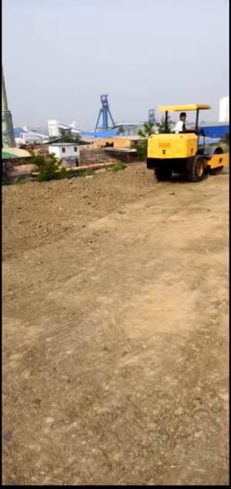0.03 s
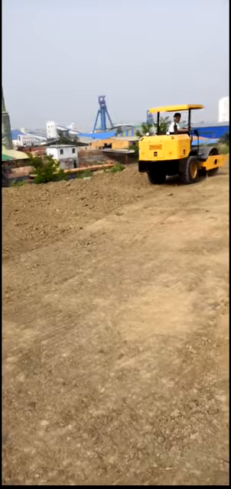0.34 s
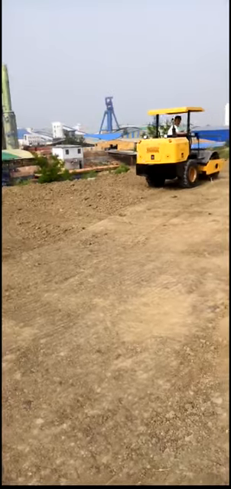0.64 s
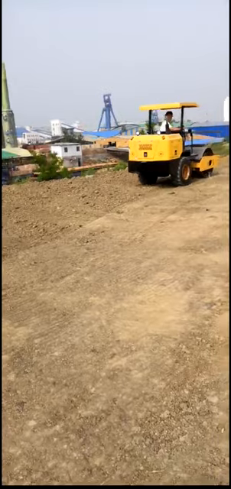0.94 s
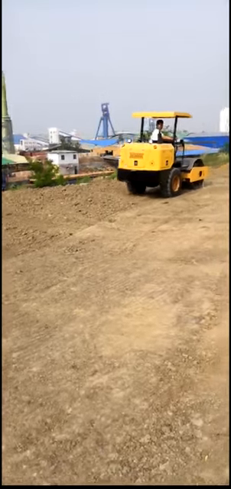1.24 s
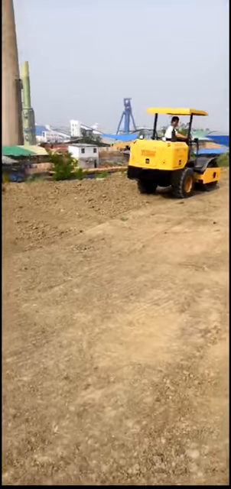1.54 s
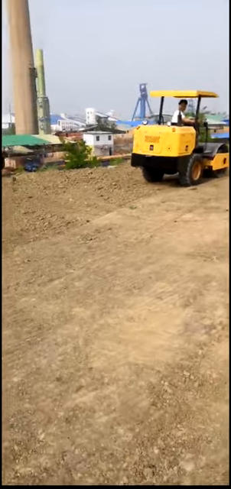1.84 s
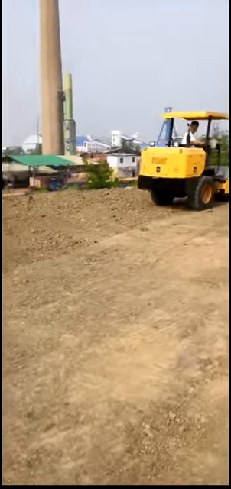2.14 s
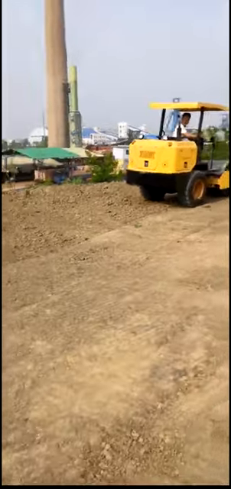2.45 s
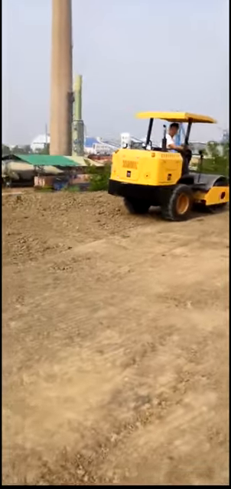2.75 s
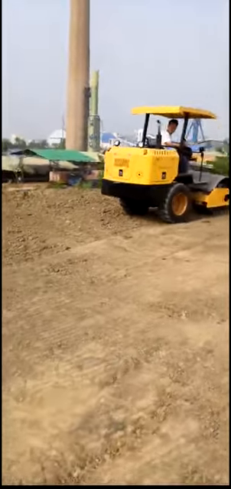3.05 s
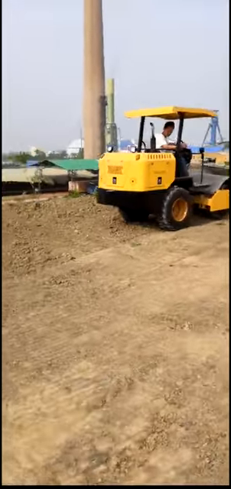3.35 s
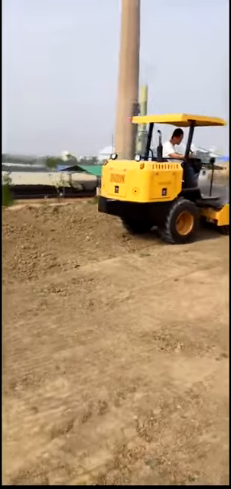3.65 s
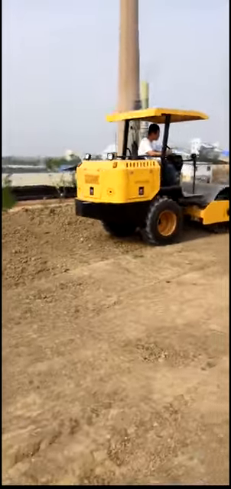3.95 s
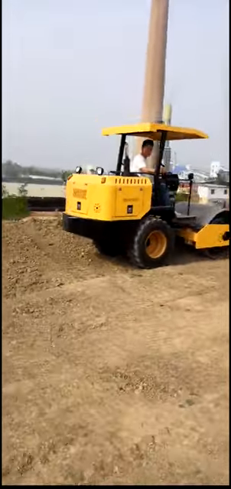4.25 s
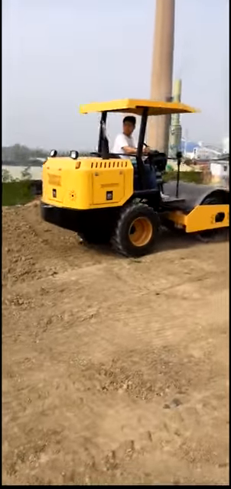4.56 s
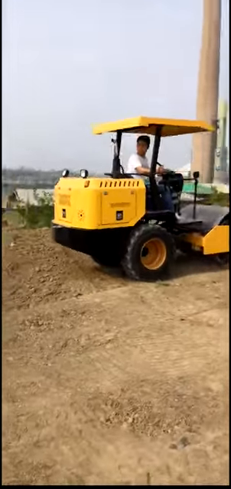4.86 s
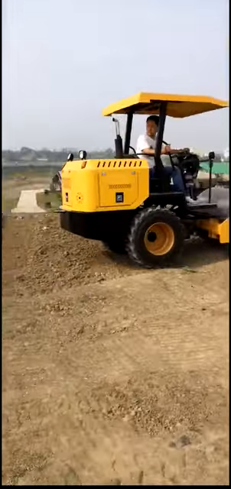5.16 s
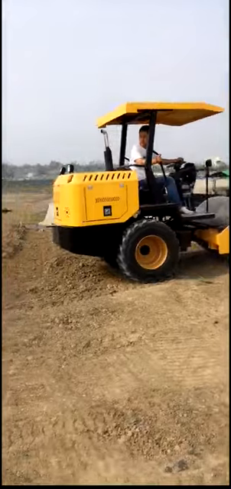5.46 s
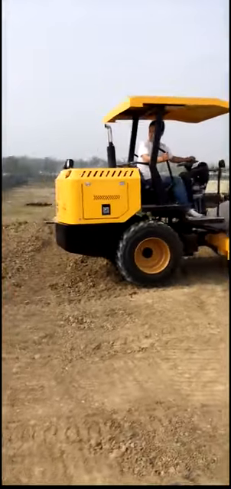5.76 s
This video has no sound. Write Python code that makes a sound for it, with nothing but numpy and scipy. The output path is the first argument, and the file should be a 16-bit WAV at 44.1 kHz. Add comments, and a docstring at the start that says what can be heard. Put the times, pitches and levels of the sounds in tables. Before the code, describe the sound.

A small road roller's diesel engine runs at a steady speed on open dirt ground. A deep exhaust drone comes first, with rapid puffing and metallic knocking over a faint whine. Loose panels rattle lightly in spells, and there is one tiny crack, like a stone under a wheel. As the machine nears the microphone, its rumble and hiss grow.

```python
"""A deep exhaust drone is heard first: a small road roller with a three-cylinder diesel comes closer
over open dirt at a steady, governed speed. Periodic firings make the drone, puff through the silencer
and shake the hood, while combustion knock rings the block. Fan and pumps whine, the drum hums, loose
panels rattle in spells and there is one small crack, as of a stone under a wheel. A hiss grows as
the machine nears and turns its side to the listener."""
import sys
import numpy as np
from scipy import signal
from scipy.fft import rfft, irfft, next_fast_len
from scipy.io import wavfile
from scipy.ndimage import map_coordinates

SR = 44100
rng = np.random.default_rng(int(sys.argv[2]) if len(sys.argv) > 2 else 0)


def store_pcm(level_fs):
    """Save levels as 16-bit WAV."""
    pcm = np.round(np.clip(level_fs, -1, 1) * 32767).astype(np.int16)
    wavfile.write(sys.argv[1], SR, np.atleast_2d(pcm).T)


N = 261072
TIME = np.arange(N) / SR
START_S, CUTOFF_HZ = .335, 13900

# The governor hunts a little. Each row: time in seconds, four-stroke cycles per second.
CYCLE_RATE = [(0.5, 18.629), (0.6, 18.911), (1.4, 18.92), (2.0, 18.775), (2.3, 18.905), (2.8, 18.879),
              (3.0, 18.718), (3.5, 18.984), (3.8, 18.714), (4.2, 18.925), (4.6, 18.73), (5.0, 18.934),
              (5.1, 18.69), (5.6, 18.893)]
# Each row: time in seconds, nearness (0 far, 1 near), turn (0 from behind, 1 side-on).
PATH = [(.3, 0.05, 0), (1.2, 0, 0.26), (2.0, 0.29, 0.21), (2.7, 0.22, 0), (3.4, 0.63, 0.24),
        (4.1, 0.83, 0.093), (4.5, 0.94, 0.48), (5.1, 0.89, 1.03), (5.9, 0.93, 1.14)]
# The engine takes load briefly. Each row: centre in seconds, half length in seconds, strength.
LOAD_SURGES = [(.52, 0.11, 1.05), (.75, 0.15, 1), (2.23, 0.11, 0.7), (2.64, 0.23, 0.8), (2.99, 0.16, 0.63),
               (5.03, 0.053, 0.3), (5.87, .14, 0.3)]
# Each part: level in dB far off, then dB gained when near, when side-on and under load.
DRONE_DB, OVERTONE_DB = (-23.5, 0.65, -2.5, 0), (-25, -4, -9.5, -0.5)
PUFF_DB, HOOD_DB = (-34.5, -7.5, 9.5, 9), (-40, 12, -2, 1.5)
CLATTER_DB, HISS_DB = (-31, 1.82, 2.34, 1.86), (-43.5, 5.5, 2, 1.5)
# The two main exhaust tones swell or fade.
# Each row: centre in seconds, half length in seconds, drone change in dB, overtone change in dB.
EXHAUST_SWELLS = [(.95, .2, 2, 3), (2.79, 0.07, 0.5, -10), (3.024, 0.094, -1, 4), (3.205, 0.09, -0.5, -4),
                  (3.48, 0.084, 0, 6.5), (3.965, 0.037, 0, -8), (4.93, 0.11, .7, -10), (5.175, .07, -1, -4)]
# Weaker engine tones. Each row: multiple of the cycle rate, relative level in dB far off and near.
HARMONICS = [(3, -43, -42), (5, -47, -50), (7, -39.5, -38), (8, -39, -44), (10, -46, -45), (11, -40, -50),
             (12, -35, -38), (13, -48, -46), (14, -55, -44), (15, -50, -32), (18, -51, -38), (19, -47, -36),
             (20, -47, -36), (22, -46, -38), (23, -46, -48), (24, -48, -44), (25, -46, -54), (27, -40, -37),
             (28, -50, -43), (30, -51, -36), (32, -51, -46), (33, -49, -48), (34, -50, -45), (35, -56, -43),
             (36, -52, -43)]
# Spectra of the noisy parts. Each row: frequency in Hz, relative spectral density in dB.
PUFF_SPECTRUM = [(30, -39), (60, -11.5), (90, -7), (125, 0.5), (165, 0), (215, -0.5), (260, -3.5),
                 (340, -9), (600, -16)]
HOOD_SPECTRUM = [(150, -20), (250, 5), (330, -5), (450, 1.5), (620, 3), (750, 8.5), (850, -11), (1200, -28),
                 (2500, -38)]
CLATTER_SPECTRUM = [(400, -32), (850, 0.5), (1000, -1), (1250, -3), (1600, -0.5), (1950, -1), (2200, -2),
                    (2600, -2), (3100, -6.5), (3700, -11.5), (4400, -16), (7000, -25), (13000, -79)]
HISS_SPECTRUM = [(2000, -10), (3800, 3), (4500, 0.5), (5400, 2), (6400, -2), (7500, -0.5), (8400, -4),
                 (9700, 0), (10600, -6.5), (11600, -13.5), (13000, -18), (14000, -20)]
STONE_SPECTRUM = [(2500, -14), (4000, -8), (5200, 12), (6500, -9), (10000, -13), (13000, -22)]
# The hood's boom moves as the machine turns. Each row: time in seconds, resonance in Hz, gain.
HOOD_BOOM = [(.4, 445, 2.5), (1.1, 477, 1.7), (1.7, 506, 0.68), (2.6, 605, 0.89), (2.98, 610, 3.6),
             (3.35, 650, 0.62), (3.85, 450, 1.4), (4.3, 590, 0.53), (4.75, 635, 0.27), (5.15, 357, 1.7),
             (5.9, 406, 0.97)]
# The block's modes. Each row: frequency in Hz, bandwidth in Hz, boost in dB.
BLOCK_RESONANCES = [(1420, 40, 2.5), (1570, 80, 1.5), (1930, 90, 2), (2550, 240, 1), (3230, 110, 1.5),
                    (3690, 130, 1.5)]
# The hiss swells, as of grit crushed under wheels and drum.
# Each row: centre in seconds, half length in seconds, boost in dB, gain of the scraping band.
GRIT_SWELLS = [(3.44, 0.1, 2, 1.0), (3.73, 0.14, 2, 0.17), (4.243, 0.078, 3, 0.29),
               (4.95, 0.091, 2.5, 0.61), (5.158, 0.043, 4, 0), (5.758, 0.14, 0.9, 0)]
# The fan's blade tone beams unevenly. Each row: time in seconds, relative level in dB.
FAN_LEVEL = [(0.34, -30.5), (1.0, -28), (1.2, -39.5), (1.85, -33), (3.1, -37.5), (3.8, -28.5), (4.15, -56),
             (5.4, -41), (5.6, -26.5)]
# Pumps and gears. Each row: multiple of the cycle rate, relative level in dB far off and near.
PUMP_TONES = [(40.63, -49.5, -39), (70.3, -53, -57), (73.7, -50.5, -74), (84.3, -51, -57)]
# Modes of loose panels. Each row: frequency in Hz, bandwidth per filter pass in Hz, relative level in dB.
PANEL_RESONANCES = [(2093, 130, -4.5), (2506, 180, -2), (2744, 160, -5.5), (3650, 140, -16),
                    (7600, 450, -15)]
# Spells of rattling. Each row: centre in seconds, half length in seconds, level in dB.
RATTLE_SPELLS = [(.63, .2, -34.5), (2.16, 0.059, -35), (2.67, .1, -34.5), (4.33, .12, -47),
                 (4.762, 0.28, -37), (5.86, 0.15, -29.5)]
# A small crack. Each row: start in seconds, level in dB.
STONE_CRACKS = [(3.715, -28)]


def exhaust(cycle, near, turn, load):
    """Periodic firing gives harmonics of three per cycle; one unequal cylinder adds the tones between."""
    drone_db = level(DRONE_DB, near, turn ** 2, load)   # the deep drone is shadowed last
    drone_db += swells((s, length, db) for s, length, db, _ in EXHAUST_SWELLS)
    overtone_db = level(OVERTONE_DB, near, turn, load)
    overtone_db += swells((s, length, db) for s, length, _, db in EXHAUST_SWELLS)
    phase_lag = (1 - near) / 4 + .1   # far off, reflections put the harmonics out of step
    out = tone(6 * cycle, drone_db, flutter=.03, flutter_hz=6)
    out += tone(9 * cycle - phase_lag, overtone_db, flutter=.1, flutter_hz=6)
    low_blend = near + 0.29 * (turn - near)   # the low tones follow the turn in part
    for k, far_db, near_db in HARMONICS:
        crank = cycle - .64 if k % 3 else cycle   # the unequal cylinder fires .64 into the cycle
        scatter = (rng.random() - .5) * k / 24   # the higher the tone, the more out of step
        blend = low_blend if k <= 20 else near
        tone_db = far_db + (near_db - far_db) * blend - .2
        out += tone(k * crank + scatter, tone_db, flutter=0.23, flutter_hz=3.3)
    return -out


def block_clatter(cycle, knock, near, turn, load):
    """Impact excitation: combustion knock rings the modes of the engine block."""
    clatter = coloured(contacts(cycle, repeat=0.24) * knock, CLATTER_SPECTRUM)
    clatter += sum((from_db(db) - 1) * resonance(clatter, hz, width) for hz, width, db in BLOCK_RESONANCES)
    # with nearness a metallic ring recedes and two hollow bands come forward
    clatter += (.55 - .55 * near) * resonance(clatter, hz=1890, width_hz=150)
    clatter += (.75 * near - .3) * resonance(clatter, hz=1170, width_hz=180)
    clatter += (.5 * near - .5) * resonance(clatter, hz=850, width_hz=280)
    clatter = reflections(clatter, count=4, share=0.17, longest_ms=7, wander_ms=0.27)
    return from_db(level(CLATTER_DB, near, turn, load)) * clatter


def silencer_puffs(cycle, near, turn, load):
    """Cavity resonance: the gas pulse of each firing rings the silencer."""
    gas = contacts(cycle, repeat=0.15)
    gas *= strokes(cycle, count=3, decay=0.14, depth=2.8, uneven_db=1.5, lag=0.07)
    puffs = coloured(gas, PUFF_SPECTRUM)
    puffs += .5 * resonance(puffs, hz=202, width_hz=19)
    return from_db(level(PUFF_DB, near, turn, load)) * rms_one(puffs)


def hood_rumble(cycle, near, turn, load):
    """Forced vibration: each firing shakes the hood, which radiates most at its resonances."""
    boom_hz, boom_gain = in_time(HOOD_BOOM)
    shaking = contacts(cycle, repeat=0.1)
    shaking *= strokes(cycle, count=3, decay=1.0, depth=4.3, uneven_db=0.8, lag=0.016)
    hood = coloured(shaking, HOOD_SPECTRUM)
    hood += boom_gain * moving_resonance(hood, boom_hz, width_hz=100)
    # the side panel comes out of shadow with nearness, the flank with the turn
    hood += (0.7 * near - .75) * resonance(hood, hz=720, width_hz=180)
    hood += (1.18 * turn - 0.52) * resonance(hood, hz=278, width_hz=110)
    return from_db(level(HOOD_DB, near, turn, load)) * hood


def injector_and_air_hiss(cycle, knock, near, turn, load):
    """Amplitude-modulated noise: injectors and cooling air hiss in pulses, brighter when louder."""
    hiss_db = level(HISS_DB, near, turn, load)
    hiss_db += swells((s, length, db) for s, length, db, _ in GRIT_SWELLS)
    scrape = swells((s, length, gain) for s, length, _, gain in GRIT_SWELLS)
    ticks = strokes(cycle, count=6, decay=0.45, depth=0.91, uneven_db=3, lag=0.4)
    hiss = coloured(rng.standard_normal(N) * ticks * knock, HISS_SPECTRUM)
    sizzle = signal.sosfilt(signal.butter(1, 7000, "high", fs=SR, output="sos"), hiss)
    hiss += 0.12 * (hiss_db - np.mean(hiss_db)) * sizzle
    hiss += scrape * resonance(hiss, hz=5500, width_hz=490)
    return from_db(hiss_db) * reflections(hiss, count=5, share=0.12, longest_ms=8, wander_ms=0.14)


def fan_and_pumps(cycle, near):
    """Rotational tones: belts and gears hold each pitch at a fixed ratio to the crank speed."""
    fan_db, = in_time(FAN_LEVEL)
    out = tone(24.3 * cycle, fan_db - 3, flutter=0.22, flutter_hz=7.1)   # 24.3 blade passes a cycle
    for ratio, far_db, near_db in PUMP_TONES:
        whine_db = far_db + (near_db - far_db) * near + .3
        out += tone(ratio * cycle + rng.random(), whine_db, flutter=0.22, flutter_hz=3.7)
    return out


def drum_hum(hz, level_db):
    """A nearly pure tone: the drum hums low and faint."""
    return tone(hz * TIME, level_db, flutter=.12, flutter_hz=2)


def panel_rattle(cycle):
    """Modal vibration: firings shake loose panels in spells, and each mode comes and goes at random."""
    shaking = strokes(cycle, count=3, decay=0.3, depth=1.0, uneven_db=-5.5, lag=0.45)
    out = np.zeros(N)
    for hz, width_hz, level_db in PANEL_RESONANCES:
        impacts = rng.standard_normal(N) * shaking
        ringing = resonance(resonance(impacts, hz, width_hz), hz, width_hz)
        swell_db = 4 * np.tanh(drift(1.5))
        out += from_db(level_db + swell_db) * rms_one(ringing)
    return swells((s, length, from_db(db)) for s, length, db in RATTLE_SPELLS) * rms_one(out)


def stone_crack(decay_s):
    """A damped transient: bright noise starts abruptly and decays exponentially."""
    burst = sum(from_db(db) * (TIME > s) * np.exp(-np.abs(TIME - s) / decay_s) for s, db in STONE_CRACKS)
    return burst * coloured(rng.standard_normal(N), STONE_SPECTRUM)


def tone(turns, level_db, flutter, flutter_hz):
    """Random modulation: a sine of the given rms level flutters in amplitude and phase."""
    angle = 2 * np.pi * turns
    in_phase = (1 + flutter * drift(flutter_hz)) * np.cos(angle)
    quadrature = flutter * drift(flutter_hz) * np.sin(angle)
    return np.sqrt(2) * from_db(level_db) * (in_phase + quadrature)


def strokes(cycle, count, decay, depth, uneven_db, lag):
    """Pulse-train envelope: count uneven blows a cycle, with decay and lag as shares of their spacing."""
    beat = cycle * count + 1 - lag
    strength = from_db(uneven_db * rng.standard_normal(2048))[beat.astype(int) % 2048]
    age = beat % 1
    return rms_one(1 + depth * strength * np.exp(-age / decay) * (1 - np.exp(-age / 0.041)))


def contacts(cycle, repeat):
    """Partly periodic noise of dense impacts: the share repeat of its power recurs every cycle."""
    pattern = rng.standard_normal(2340)
    recurring = rms_one(map_coordinates(pattern, [cycle % 1 * len(pattern)], order=1, mode="grid-wrap"))
    return np.sqrt(repeat) * recurring + np.sqrt(1 - repeat) * rng.standard_normal(N)


def reflections(x, count, share, longest_ms, wander_ms):
    """Comb filtering: echoes off canopy, wheels and drum interfere along slowly changing paths."""
    out = x.copy()
    for lag_ms in np.linspace(longest_ms / count, longest_ms, count) * rng.uniform(.85, 1.15, count):
        lag = (lag_ms + wander_ms * drift(0.3)) * SR / 1000
        out += share * rng.choice([-1, 1]) * map_coordinates(x, [np.arange(N) - lag], order=3)
    return rms_one(out)


def resonator(hz, width_hz):
    """Filter coefficients of a damped oscillator with a peak gain of 1."""
    r = np.exp(-np.pi * width_hz / SR)
    return (1 - r * r) / 2 * np.array([1, 0, -1]), [1, -2 * r * np.cos(2 * np.pi * hz / SR), r * r]


def resonance(x, hz, width_hz):
    """Forced response of a damped oscillator to x."""
    return signal.lfilter(*resonator(hz, width_hz), x)


def moving_resonance(x, hz, width_hz):
    """Time-varying resonance: the centre follows the curve hz, block by block."""
    out, state = np.zeros(N), np.zeros(2)
    for i in range(0, N, 512):
        out[i:i + 512], state = signal.lfilter(*resonator(hz[i], width_hz), x[i:i + 512], zi=state)
    return out


def coloured(x, spectrum):
    """Spectral shaping to an rms of 1, falling 6.6 dB per octave past the table's ends."""
    size = next_fast_len(N + SR // 4)
    octave = np.log2(np.maximum(np.arange(size // 2 + 1) * SR / size, 1))
    hz, db = np.transpose(spectrum)
    outside = np.abs(octave - np.clip(octave, np.log2(hz[0]), np.log2(hz[-1])))
    gain = from_db(np.interp(octave, np.log2(hz), db) - 6.6 * outside)
    return rms_one(irfft(rfft(x, size) * gain, size)[:N])


def drift(hz):
    """Slow random fluctuation: low-passed noise with an rms of 1."""
    r = np.exp(-80 * np.pi * hz / SR)
    slow = signal.lfilter([1], [1, -2 * r, r * r], rng.standard_normal(N // 40 + 2002))[2000:]
    return np.interp(np.arange(N) / 40, np.arange(len(slow)), rms_one(slow))


def level(law, near, turn, load):
    """Gains add in dB: a part's level follows distance, heading and engine load."""
    far_db, near_db, turn_db, load_db = law
    return far_db + near_db * near + turn_db * turn + load_db * load


def swells(rows):
    """Sum of Gaussian bumps. Each row: centre in seconds, half length in seconds, height."""
    return sum(height * np.exp(-((TIME - s) / length) ** 2) for s, length, height in rows)


def in_time(rows):
    """Linear interpolation: one curve for each column after the time."""
    s, *columns = np.transpose(rows)
    return [np.interp(TIME, s, c) for c in columns]


def from_db(db):
    return 10 ** (np.asarray(db) / 20)


def rms_one(x):
    return x / np.sqrt(np.mean(x ** 2) + 1e-20)


def scene():
    """Superposition: the sources add, and one slightly wavering crank times all the engine's parts."""
    speed, = in_time(CYCLE_RATE)
    near, turn = in_time(PATH)
    load = swells(LOAD_SURGES)
    cycle = np.cumsum(speed * (1 + .0012 * drift(12))) / SR
    mix = sum(part(cycle, near, turn, load) for part in (exhaust, silencer_puffs, hood_rumble))
    knock = strokes(cycle, count=3, decay=0.16, depth=0.62, uneven_db=0.5, lag=0.45)
    mix += block_clatter(cycle, knock, near, turn, load)
    mix += injector_and_air_hiss(cycle, knock, near, turn, load)
    mix += fan_and_pumps(cycle, near) + drum_hum(hz=41, level_db=-50.5)
    mix += panel_rattle(cycle) + stone_crack(decay_s=0.0046)
    return mix[None]


def record(dry):
    """Gating and band limiting: the sound sets in at START_S, and a steep low-pass cuts the top."""
    onset = np.clip((TIME - START_S) / .002, 0, 1)
    return signal.sosfilt(signal.ellip(12, .1, 90, CUTOFF_HZ, fs=SR, output="sos"), dry * onset)


dry = scene()
out = record(dry)
store_pcm(out)
```